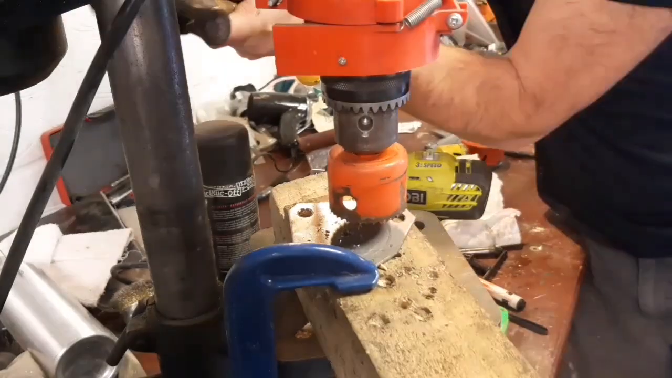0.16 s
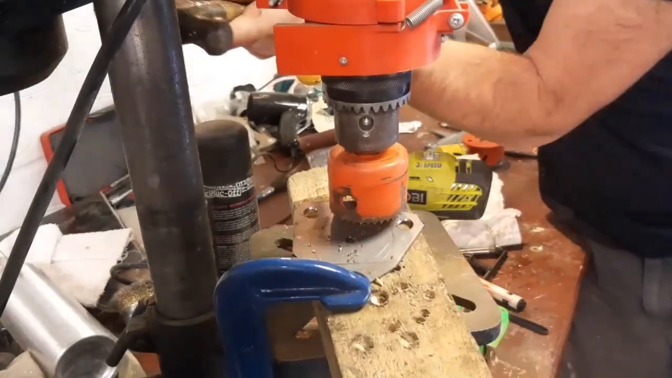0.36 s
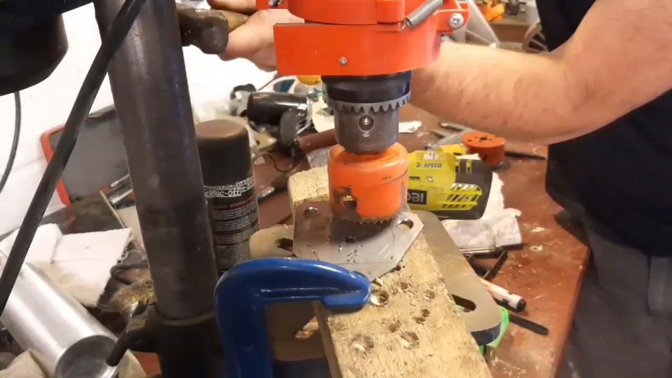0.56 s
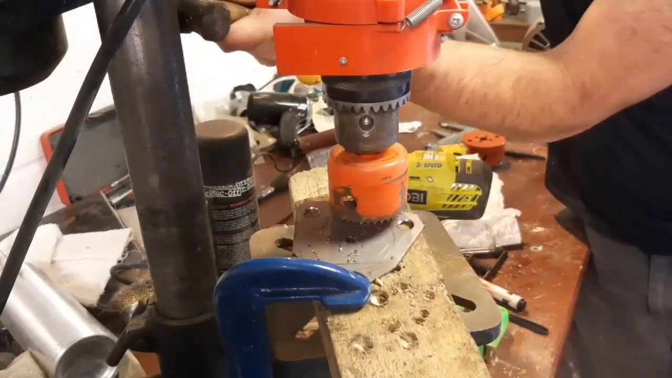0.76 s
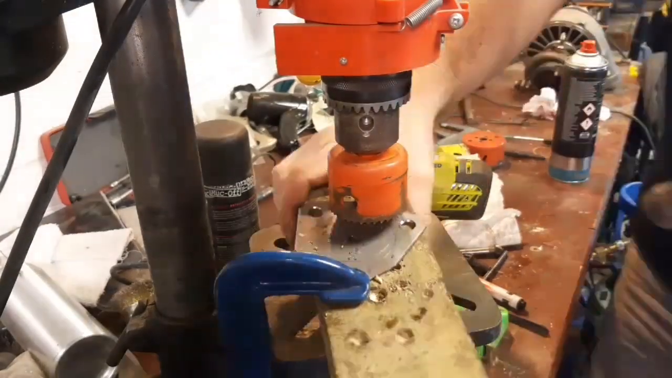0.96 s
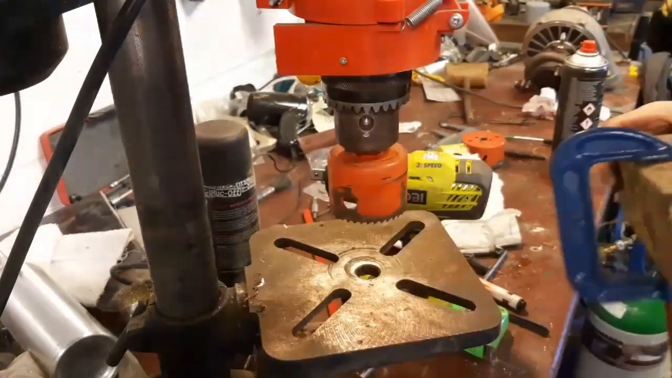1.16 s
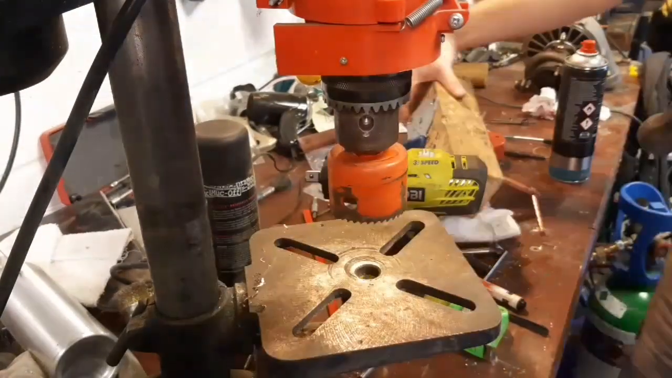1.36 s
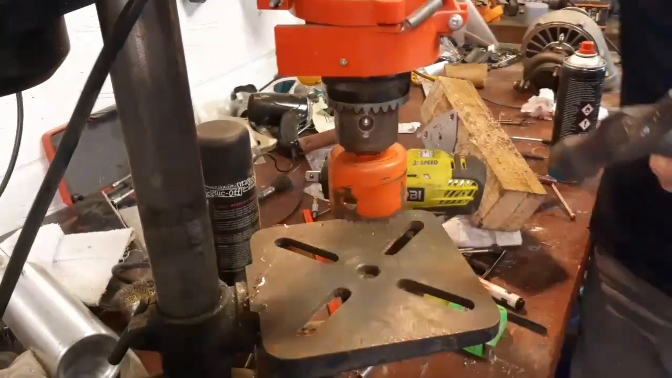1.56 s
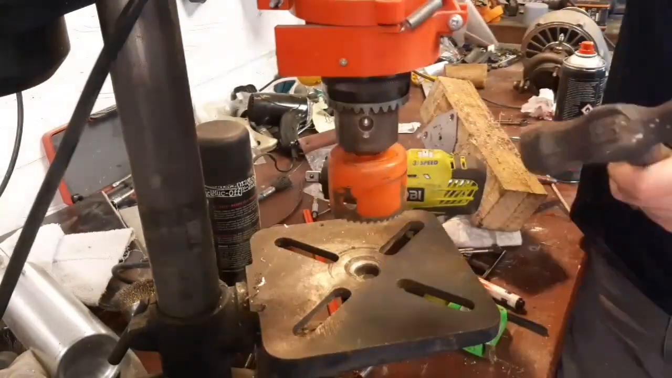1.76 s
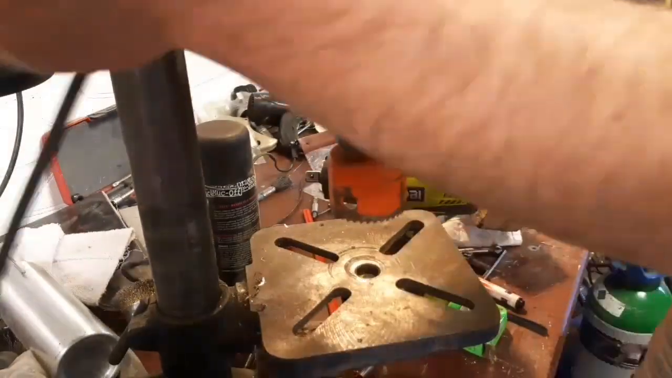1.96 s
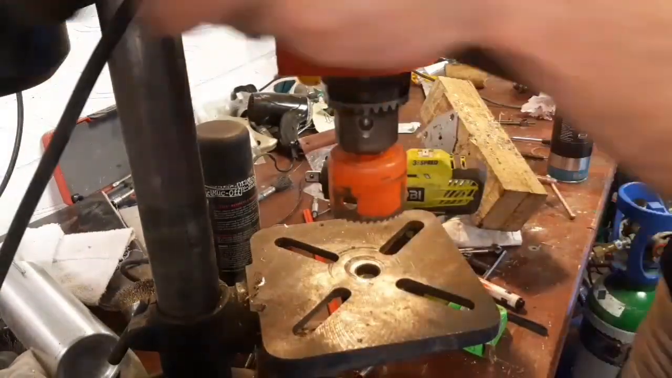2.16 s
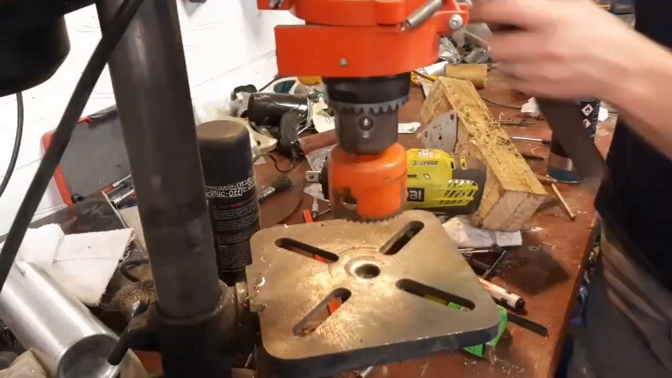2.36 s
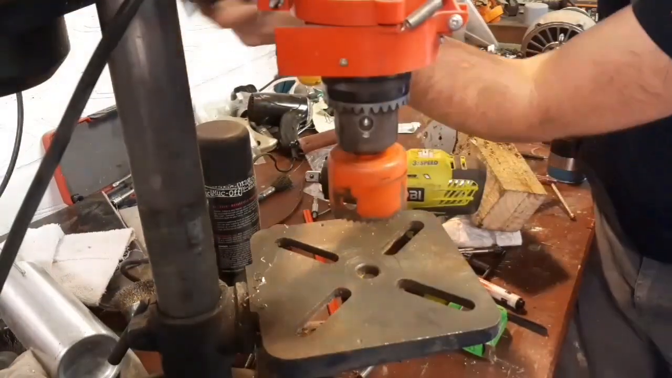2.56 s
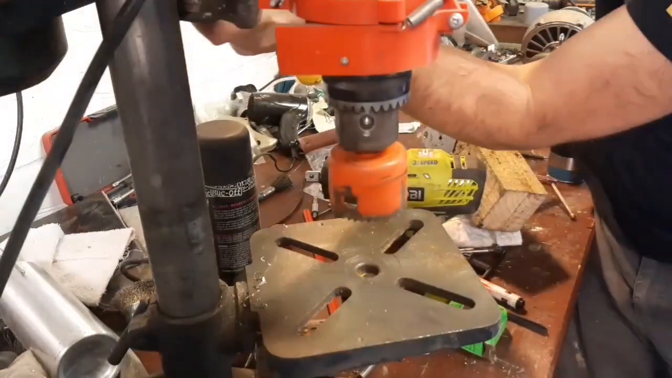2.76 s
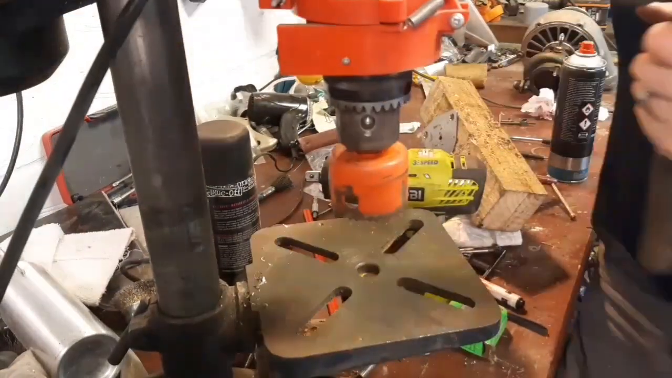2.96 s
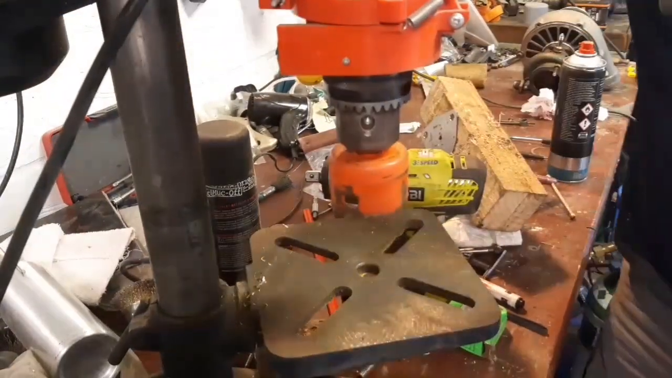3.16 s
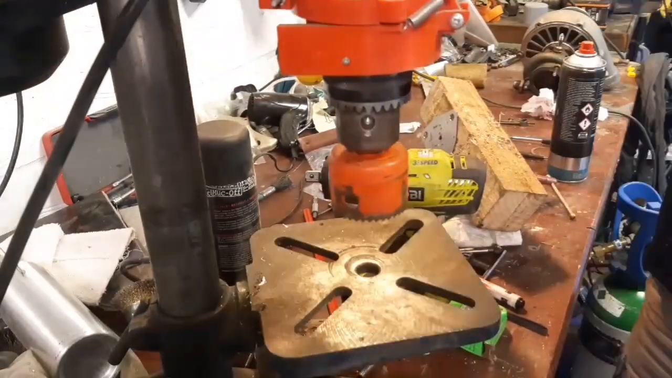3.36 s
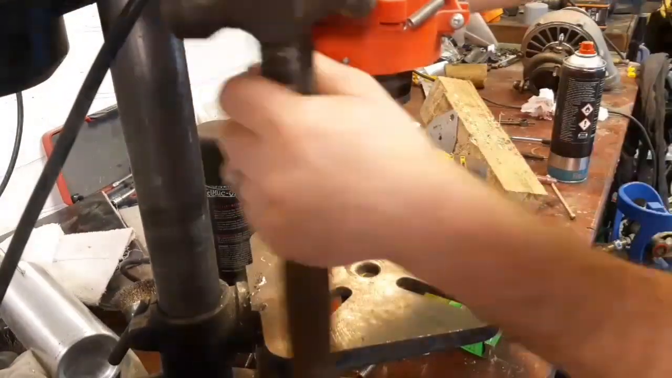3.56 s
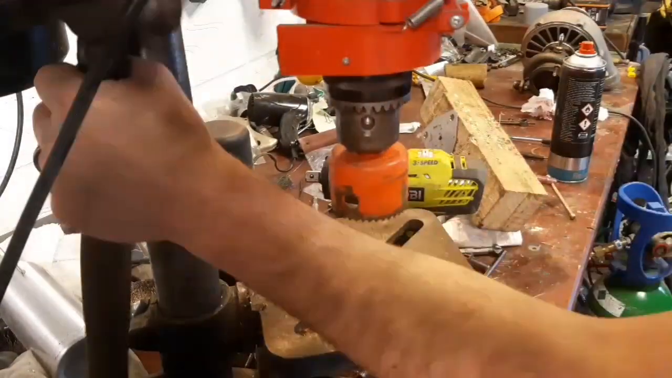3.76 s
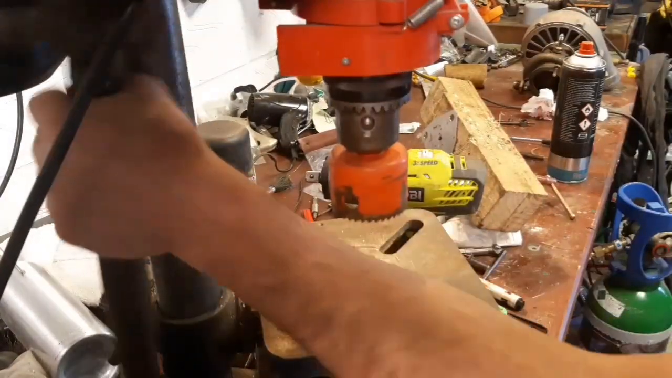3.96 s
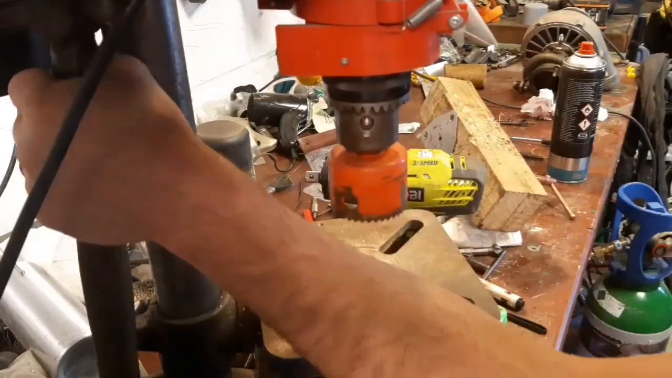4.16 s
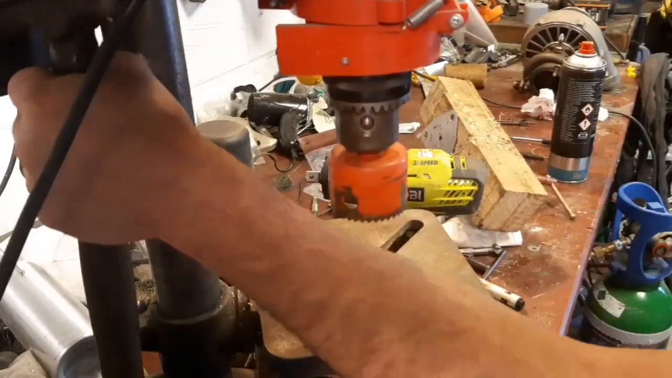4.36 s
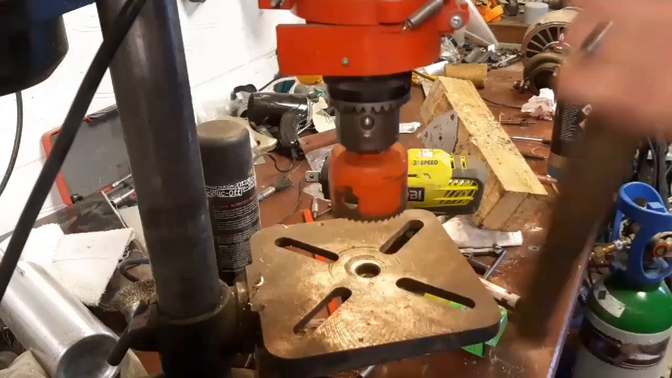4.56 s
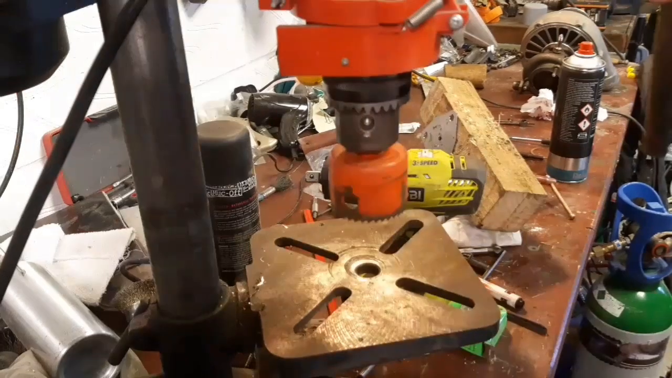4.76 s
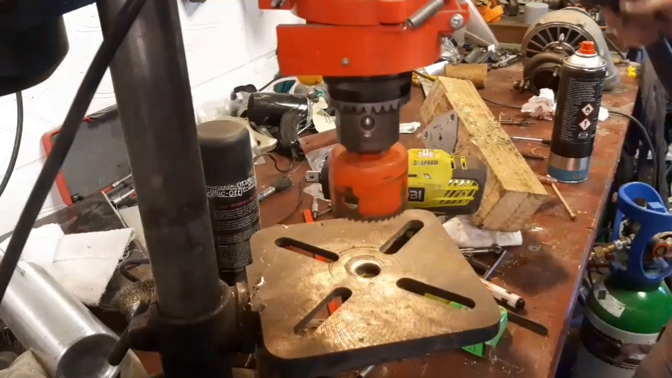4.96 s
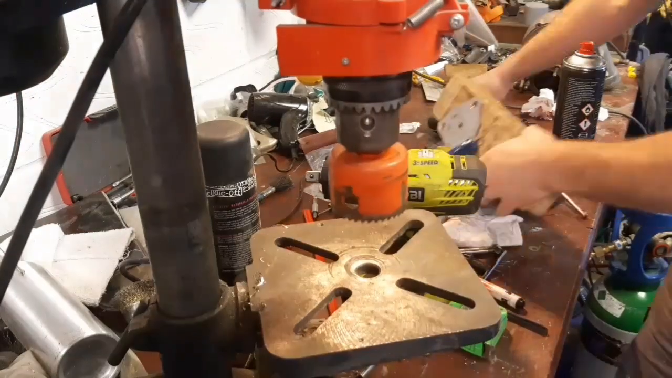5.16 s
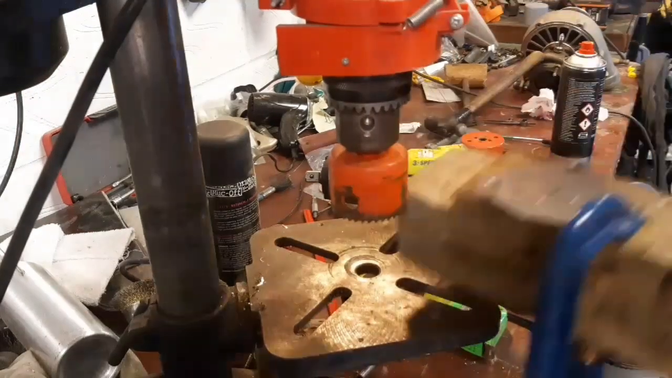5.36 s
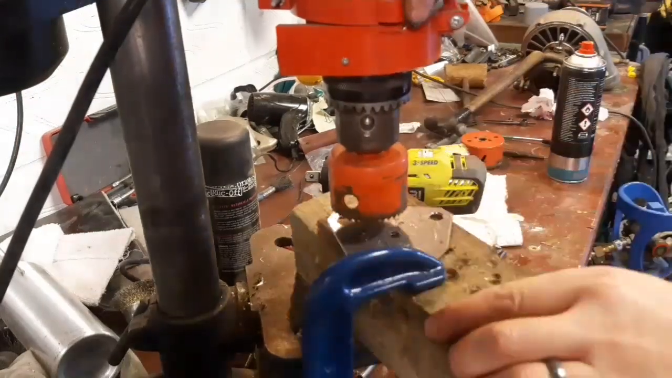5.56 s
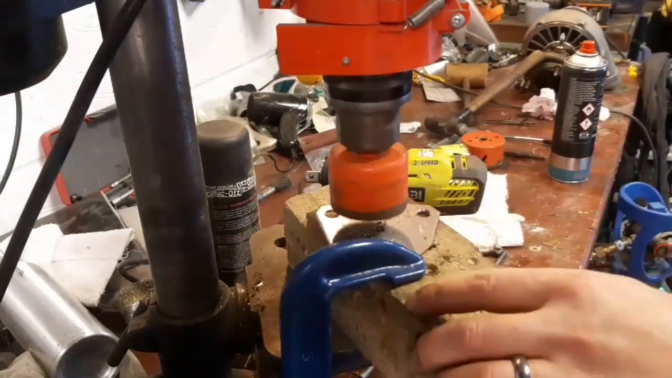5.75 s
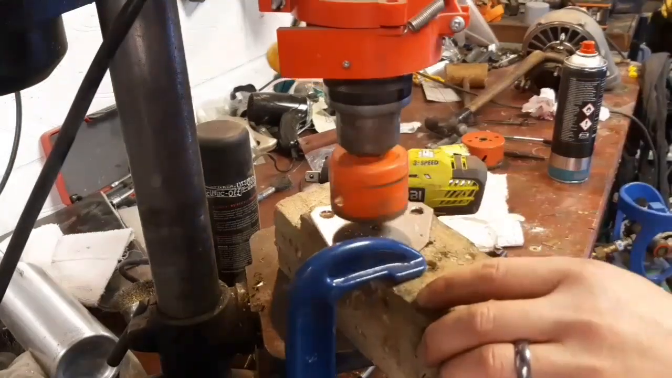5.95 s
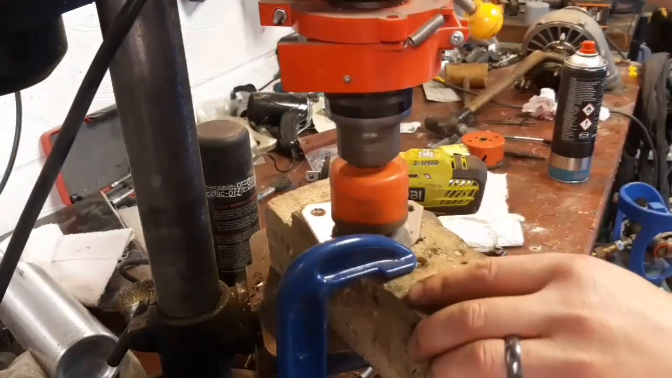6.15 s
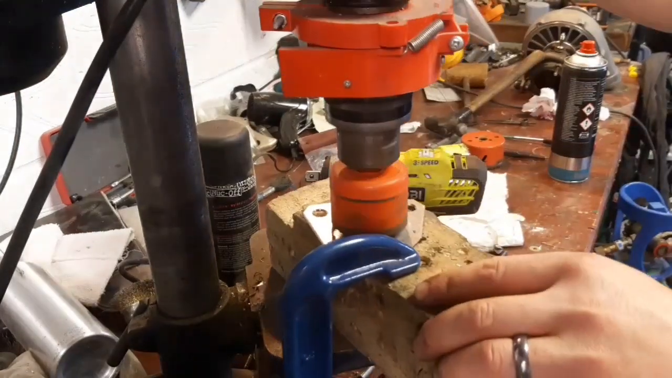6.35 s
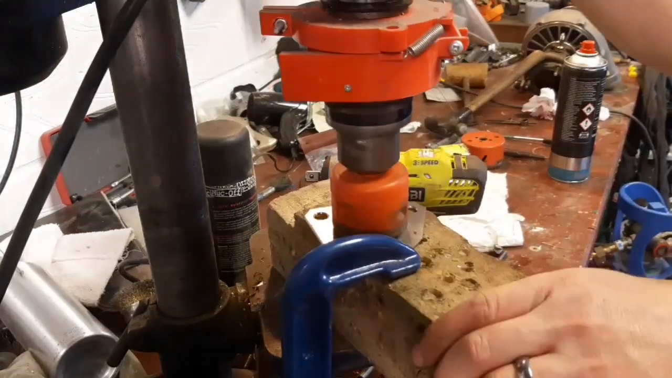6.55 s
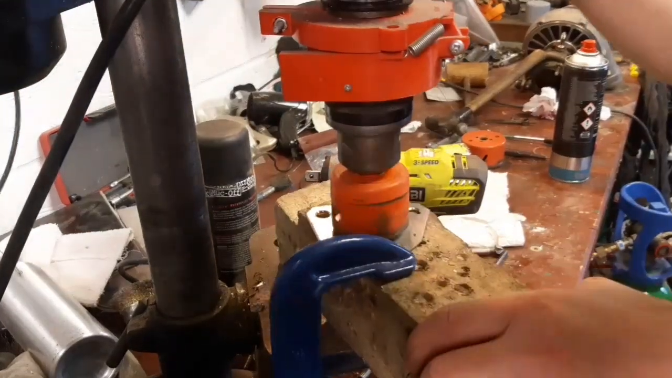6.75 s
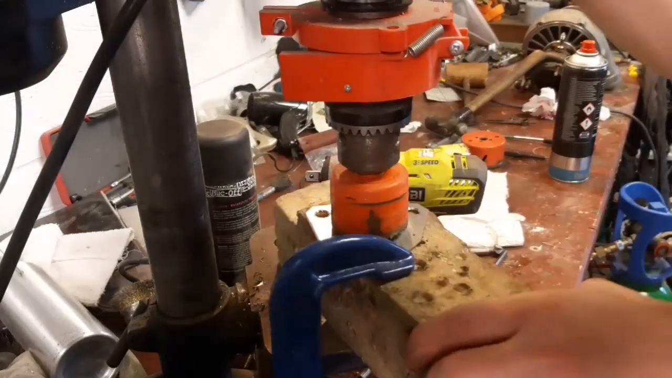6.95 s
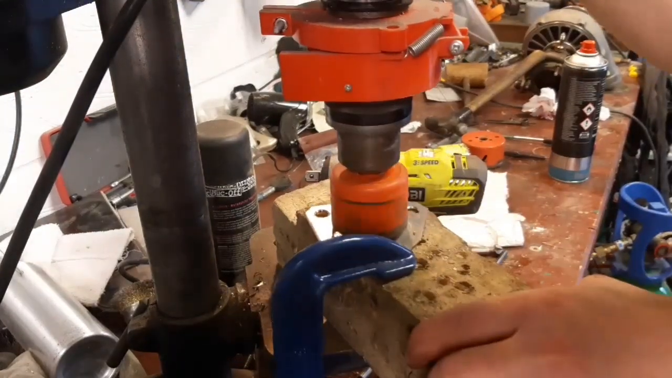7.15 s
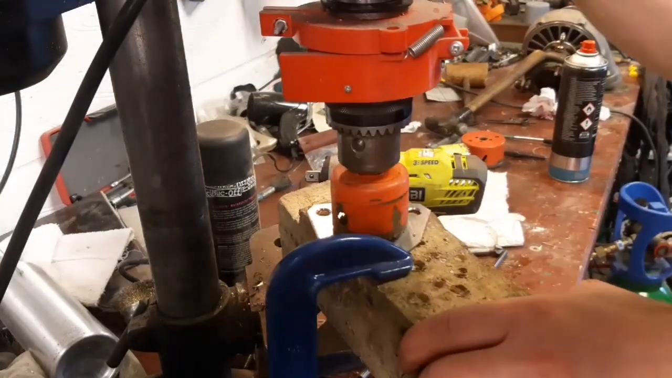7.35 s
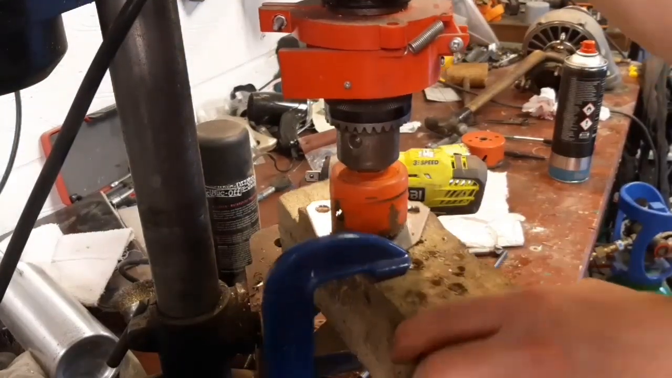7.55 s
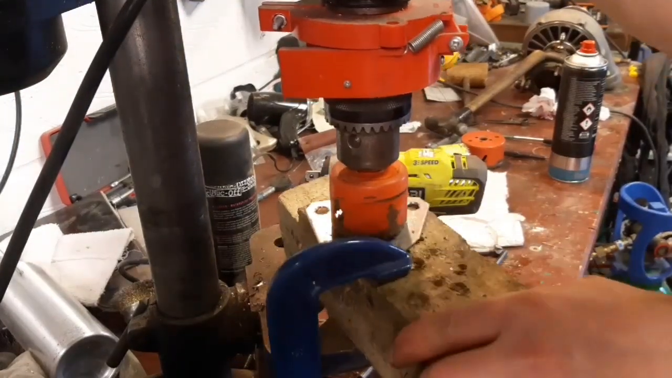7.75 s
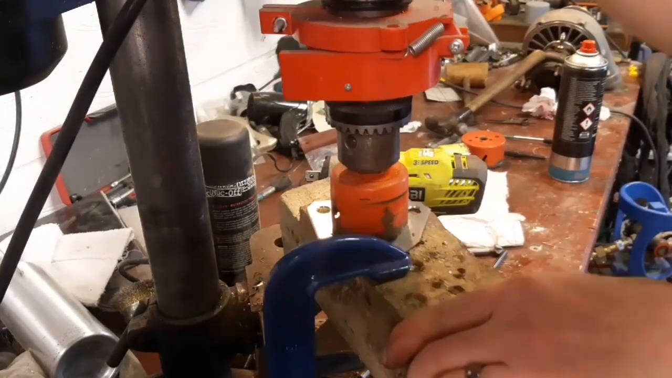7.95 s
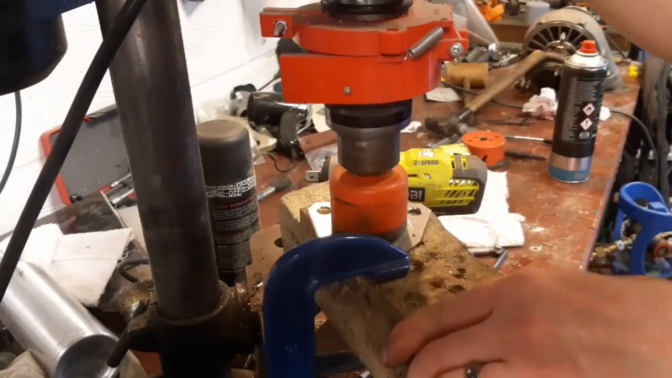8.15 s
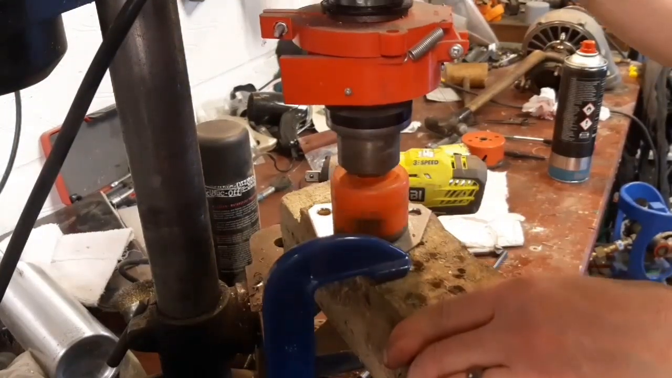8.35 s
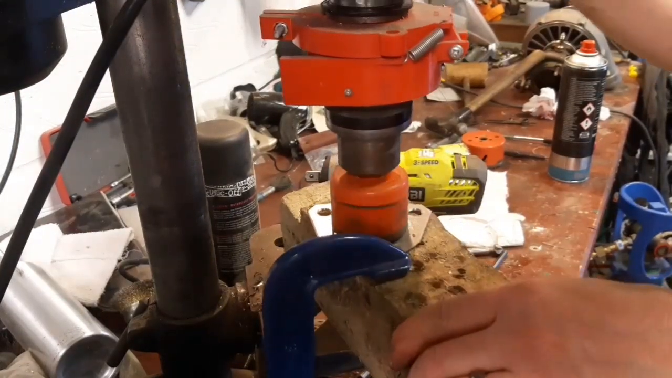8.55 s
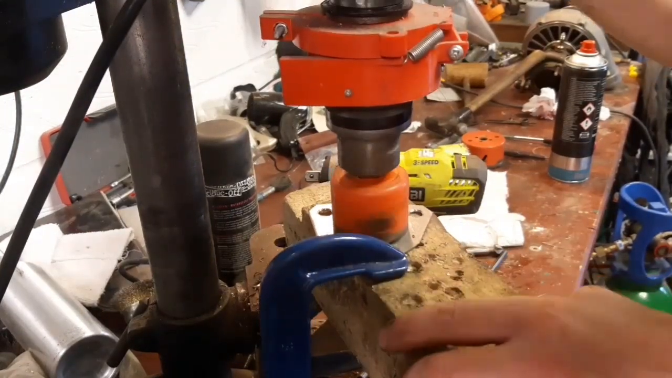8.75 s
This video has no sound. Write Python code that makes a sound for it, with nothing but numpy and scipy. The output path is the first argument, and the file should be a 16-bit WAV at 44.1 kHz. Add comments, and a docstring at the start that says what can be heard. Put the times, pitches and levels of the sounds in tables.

```python
"""Quick runs of hammer blows ring on the iron table of a drill press, close by in a small, hard workshop.
Between and after the runs, a clamped wooden block and tools are knocked and dragged about.
Then the motor starts with a jerk: its magnetic pull makes a buzz, and the gears rattle the housing.
A hole saw bites into metal. Its teeth hiss, catch and chatter, and at the end its rim squeals once a turn."""
import sys
import numpy as np
from scipy import signal
from scipy.fft import rfft, irfft, next_fast_len
from scipy.io import wavfile
from scipy.ndimage import uniform_filter1d

SR = 44100
rng = np.random.default_rng(int(sys.argv[2]) if len(sys.argv) > 2 else 0)


def unload_audio(sound):
    """Save the sound as a 16-bit wav file, at the path given as the first command line argument."""
    columns = np.transpose(np.atleast_2d(sound))
    # keep every value between -1 and 1, then stretch to whole-number steps
    steps = np.round(np.clip(columns, -1, 1) * 32767)
    wavfile.write(sys.argv[1], SR, steps.astype(np.int16))


N = 388962
T = np.arange(N) / SR


# The iron's modes (its natural tones): pitch_hz, level_db, decay_s (time to fade by 60 dB)
IRON_MODES = [(260, -30, 0.11), (403, -23.5, .12), (601, -13.5, 0.067), (944, -14, 0.099),
              (1058, -11, 0.074), (1180, -11.5, 0.14), (1238, -4, 0.098), (1285, -4, 0.04), (1610, -7, 0.1),
              (1870, -20.5, .07), (2403, -4.5, 0.034), (2790, -9.5, 0.038), (3440, -6, 0.09),
              (3800, -9, 0.053), (3990, -3, 0.038), (5260, -25.5, 0.1), (6620, -13, 0.06),
              (7450, -16.5, 0.055), (8300, -18.5, 0.054), (9700, -12.5, 0.072), (12400, -15, 0.044)]
# Many small modes, blurred into noise: pitch_hz, level_db
CLANG_COLOUR = [(35, -64), (60, -31.5), (396, -21.5), (822, -15), (1260, -3.5), (2010, -10), (3990, -8.5),
                (5950, -21), (10200, -15), (15300, -21.5), (16800, -37)]
# Each run hits its own spot: ends_by_s, column_db, hammer_head_db, low_db, middle_db, upper_db
HAMMER_SPOTS = [(0.3, -40.5, -18, 4.5, -3, -11), (1.5, -40.5, -22, 2, -1, -8),
                (3.1, -32.5, -27.5, 5, 2, -2), (4.5, -40.5, -18, -5, 0.5, 2)]
# Hammer blows: start_s, level_db
HAMMER_BLOWS = [(0.037, -9), (0.082, -10), (0.127, -10), (0.17, -9), (0.215, -17), (0.493, -9.5),
                (0.528, -10.5), (0.572, -8.5), (2.409, -9.5), (2.465, -7.5), (2.517, -9.5), (2.567, -9),
                (2.612, -9), (2.658, -9.5), (3.587, -6.5), (3.6293, -6.5), (3.666, -7.5), (3.703, -7.5),
                (3.741, -8), (3.78, -7.5), (3.818, -7.5), (3.856, -10), (3.895, -7), (3.937, -6.5),
                (3.971, -7)]

def hammer():
    """Each blow rings the iron table, the press's column and the hammer head, over a tick and a clang."""
    out, t, clang = np.zeros((2, N)), T[:SR], noise(CLANG_COLOUR)
    dull = shape(clang, [(150, -10), (300, 1), (2000, -3.5), (4200, -9.5), (5500, -7.5), (12000, -12.5)])
    boom = unit(shape(clang, [(190, -23), (260, -1), (620, -8.5), (900, -29.5)]))
    hz, mode_db, decay_s = (c[:, None] for c in np.transpose(IRON_MODES))
    low, middle, upper = hz < 700, (hz > 700) & (hz < 1500), (hz > 3000) & (hz < 9000)
    fades = 1000. ** (-t / decay_s) * gain(mode_db)
    column = tone(2647, t) * fall(t, decay_s=0.7)
    head = tone(10300, t) * fall(t, decay_s=0.13)
    tick = noise([(1500, -18.5), (3500, -2.5), (12000, 3), (17000, -2.5)])
    blows = [(-0.0046, -11)] + list(HAMMER_BLOWS)  # one blow is already ringing at the start
    next_starts = [blow[0] for blow in HAMMER_BLOWS] + [T[-1]]
    for (start_s, db), next_s in zip(blows, next_starts):
        spot = next(row[1:] for row in HAMMER_SPOTS if start_s < row[0])
        column_db, head_db, low_db, middle_db, upper_db = spot
        force, flip, detune = rng.standard_normal((3, len(IRON_MODES), 1))
        strength = np.sign(flip) * gain(2.5 * force + low_db * low + middle_db * middle + upper_db * upper)
        rings = fades * tone(hz * (1 + 0.0044 * detune), t)  # the grip shifts the pitches a little
        x = gain(-12) * np.sum(strength * rings, axis=0) + gain(column_db) * column + gain(head_db) * head
        x *= np.clip((next_s - start_s - t) / 0.002 + 1, 0, 1)  # the next blow chokes the ring
        i = rng.integers(N - SR)
        piece = slice(i, i + SR)
        x += gain(-15) * (clang[piece] * fall(t, 0.057) + dull[piece] * fall(t, 0.12))
        x += gain(low_db - 32.5) * boom[piece] * fall(t, 0.13, rise_s=0.0072)
        x += gain(-5) * tick[piece] * fall(t, 0.008, rise_s=0.0001)
        add(out, start_s, gain(db) * x)
    bass_trim = [(50, -6.5), (170, -1), (250, 1.5), (1000, 1)]  # trim the deep bass of the blows
    return np.array([shape(x, bass_trim) for x in out])


MOTOR_ON_S, BUZZ_HZ = 5.52, 99.56

def drill_press():
    """The motor starts with a jerk and runs on; the saw seizes once, boosting the rattle and hiss."""
    running_s = np.maximum(T - MOTOR_ON_S, 0)
    fade_in = np.clip(running_s / 0.0183, 0, 1)
    jerk_db = 12.5 * np.exp(-running_s / 0.021)
    seize = np.exp(-((T - 7.878) / 0.017) ** 2)
    phase = wavering_phase(BUZZ_HZ, spread=0.00056, rate_hz=6)
    return fade_in * (motor_buzz(phase) + gear_rattle(phase, running_s, jerk_db + 12 * seize)
                      + teeth_hiss(jerk_db + 17 * seize) + bench_rumble())


# Tones of the mains buzz: multiple (of BUZZ_HZ), level_db
BUZZ_TONES = [(4, -45.5), (12, -38.5), (13, -54), (15, -40), (16, -39), (17, -45.5), (19, -37), (21, -34.5),
              (23, -39), (24, -43), (27, -39.5), (29, -50.5)]
# Thin, steady tones of the drive: pitch_hz, level_db
DRIVE_WHINES = [(748.3, -49), (775.2, -49), (796.7, -48), (888.2, -51)]

def motor_buzz(phase):
    """Mains power makes the motor buzz while the drive whines; each tone's level wavers on its own."""
    dip_db = -3 * np.clip((T - 7.65) / 0.25, 0, 1)  # the lower tones weaken in the deep cut
    buzz = sum(gain(db + 1.5 + dip_db * (k < 22) + 2 * wander(5)) * np.sin(k * phase + 7 * rng.random())
               for k, db in BUZZ_TONES)
    return buzz + sum(gain(db + 0.5 + 0.83 * wander(5)) * np.sin(hz / BUZZ_HZ * phase)
                      for hz, db in DRIVE_WHINES)


# Where the head of the press rings: pitch_hz
HEAD_PITCHES = [1085, 1290, 1385, 1680, 1880, 1975, 2270, 2360, 2467, 2750, 2885, 2960, 4055, 1900]
# One row for each of those pitches: width_hz, level_db
HEAD_RINGS = [(18, -12), (14, -12.5), (14.1, -11), (27.6, -4), (40, -1), (30, -0.5), (30, 2.5), (80.6, 3.5),
              (22.2, 2.5), (145, 7), (20, -14), (18, -13.5), (45, 16), (1990, 9.5)]
# Where the case booms: pitch_hz, width_hz, level_db
CASE_RINGS = [(261, 42, -15), (552, 67, -1.5), (620, 52, -3.5), (721, 56, -1.5), (913, 72, 0),
              (1042, 53, -5.5)]
# Rattle as the load on the gears changes: time_s, level_db
GEAR_LOAD = [(5.6, -23.5), (5.7, -21.5), (5.95, -22.5), (6.75, -23.5), (6.93, -21.5), (7.18, -25.5),
             (7.3, -21.5), (7.65, -23.5), (7.84, -21.5), (7.92, -26), (8.3, -23), (8.76, -22),
             (8.82, -24.5)]
# The belt cover's hum swelling and settling: time_s, level_db
COVER_HUM = [(5.56, -50), (5.59, -31), (5.72, -29.5), (5.9, -37), (7.0, -37.5), (8.8, -42)]

def gear_rattle(phase, running_s, boost_db):
    """The gears shake the head, case and belt cover, harder with every magnetic pull of the motor."""
    rattle = rng.standard_normal(N) * gain(1.1 * np.cos(phase) + 0.95 * wander(200))
    head = sum(gain(db + 0.92 * wander(12)) * unit(ring(rattle, hz, width))
               for hz, (width, db) in zip(HEAD_PITCHES, HEAD_RINGS))
    head = unit(shape(head, [(500, -50), (1000, 11), (2900, 5), (3300, -2), (6000, -37.5)]))
    case = unit(sum(gain(db + 1.6 * wander(11)) * ring_twice(rattle, hz, width, 3 * width)
                    for hz, width, db in CASE_RINGS))
    cover = ring_twice(rattle, 410.6, 26, 78)
    load_db = curve(GEAR_LOAD)
    case_db = load_db - 12.5 + 0.59 * running_s  # the boom grows as the saw sinks
    return gain(load_db + boost_db - 3.5) * head + gain(case_db) * case + gain(curve(COVER_HUM) - 1.5) * cover


# The saw's body ringing under its teeth: pitch_hz, level_db
HISS_COLOUR = [(1760, -20.5), (3000, -34.5), (3100, -4), (3740, -5), (3920, -6), (4060, -17), (4350, -6),
               (5530, -2.5), (7180, -12.5), (9390, -11.5), (10800, -14.5), (12700, -12.5), (15500, -17)]
# Hiss as the depth of the cut changes: time_s, level_db
CUT_LEVELS = [(5.6, -40), (6.75, -39.5), (7.3, -39), (7.65, -38.5), (7.97, -40.5), (8.3, -34), (8.76, -32)]

def teeth_hiss(boost_db):
    """Teeth scrape the metal with a fluttering hiss, dotted with tiny chips."""
    chips = 1 + gain(25) * grains(per_second=250, spread_db=2, samples=80)
    hiss = noise(list(HISS_COLOUR[:-1]) + [(15700, -12), (15900, -53)])  # a steep drop at the top
    flutter_db = 0.84 * wander(60) + 0.51 * wander(260)
    return gain(curve(CUT_LEVELS) + boost_db + flutter_db) * chips * hiss


# Where the saw's cup rings: pitch_hz, width_hz, level_db
CUP_RINGS = [(6076, 200, 0), (8800, 2800, -6), (12800, 380, -7), (14200, 200, -9)]
# Teeth catching the metal: start_s, level_db, pitch_hz, jolt_db
TOOTH_CATCHES = [(6.2741, -15, 8500, 0.5), (6.3854, -7.5, 8900, -21), (6.505, -3.5, 8780, -25),
                 (6.5643, -6, 5900, -16), (6.8274, -18.5, 6200, 2), (6.9087, -8.5, 6000, 2),
                 (6.9596, -5, 9150, -9.5), (7.1384, -14, 9250, -23), (7.2686, -11.5, 5100, -5),
                 (7.3038, -23, 5790, 8), (7.3248, -7.5, 6060, -5.5), (7.372, -16.5, 6040, 0),
                 (7.4282, -7, 5870, -8), (7.6954, -15, 6200, 5.5), (7.8266, -7, 5110, -1),
                 (7.854, -5, 7260, -17), (7.8685, -13, 7310, -1), (7.8969, -7, 5200, -2),
                 (7.9254, -9.5, 5060, -2)]

def teeth_catching(white):
    """Teeth snag in short bursts that ring the saw's cup and jolt the wooden block under the metal."""
    out, t = np.zeros((2, N)), T[:SR // 10]
    cup = [gain(db) * ring_twice(white, hz, width, 2 * width) for hz, width, db in CUP_RINGS]
    jolt = noise([(120, -48.5), (300, -4), (1000, 0.5), (2500, 1), (4000, -6), (15500, -13), (16000, -40)])
    jolt += gain(-4.5) * unit(ring(white, hz=543, width_hz=90))  # the block
    chatter = [(7.472 + k * 0.033, -17.5 + 2.6 * rng.standard_normal(), 5900, 5)
               for k in range(8)]  # a spell of evenly spaced catches
    swell = bump(t, peak_s=0.0048)
    for start_s, db, hz, jolt_db in list(TOOTH_CATCHES) + chatter:
        here = slice(int(start_s * SR), int(start_s * SR) + len(t))
        rings = sum(gain(-22.5 + 1.1 * rng.standard_normal()) * mode[here] for mode in cup)
        rings += gain(-20.5) * ring_twice(white[here], hz, 580, 1300)
        burst = rings * swell ** 4 + gain(jolt_db - 12) * jolt[here] * swell ** 2
        add(out, start_s - 0.003, gain(db) * burst)
    return out


# How strong the once-a-turn squeal is: time_s, level_db
SQUEAL_LEVELS = [(7.99, -20.5), (8.16, -13), (8.33, -11.5), (8.5, -15), (8.6, -18), (8.7, -16), (8.75, -19)]
# Shorter, single shrieks: time_s, level_db
RIM_SHRIEKS = [(7.85, -19), (7.8725, -7), (8.046, -16), (8.103, -18), (8.157, -8), (8.275, -9), (8.696, -8)]
SQUEAL_HZ, TURN_S = 7330, 0.0575

def rim_squeal(white):
    """The saw's rim squeals on part of each turn: a high tone, its octave and some grinding noise."""
    loudness = gain(-45) * ((T > RIM_SHRIEKS[0][0]) & (T < SQUEAL_LEVELS[-1][0]))  # faint between swells
    turns = 7.983 + TURN_S * np.arange(14)
    swells = [(s, np.interp(s, *np.transpose(SQUEAL_LEVELS)), 0.015) for s in turns]
    shrieks = [(s, db, 0.0085) for s, db in RIM_SHRIEKS]
    for time_s, db, peak_s in swells + shrieks:
        loudness += gain(db - 16.5) * bump(T - time_s + 0.0071, peak_s) ** 2
    phase = wavering_phase(SQUEAL_HZ, spread=0.0052, rate_hz=280)
    grind = unit(ring(white, SQUEAL_HZ, width_hz=600))
    squeal = np.sin(phase) + gain(-17) * np.sin(2 * phase) + gain(-6.5) * grind
    return loudness * gain(2.9 * wander(300)) * squeal


# Modes of the wooden block: pitch_hz, level_db, decay_s
WOOD_MODES = [(254, -12, 0.13), (407.6, -8, 0.15), (600, -3.5, 0.074), (862, -2.5, 0.048), (1215, -2, .07),
              (1540, -4.5, .04), (2030, -4.5, 0.053), (2740, -1.5, .03)]
# Modes of a steel tool, used for every other object: pitch_hz, level_db, decay_s
TOOL_MODES = [(1470, -5, 0.058), (1685, -6, 0.075), (2356, -6.5, 0.1), (2670, -12, 0.073), (3281, -3, 0.05),
              (3450, -5, 0.1), (4030, -6.5, 0.04), (8100, -16, .06)]
# How each named object sounds: thud_db, body_db, modes_db, base_decay_s
OBJECT_SOUNDS = {"block": (-21.5, -20.5, -19, 0.1478), "wrench": (-31.5, -17, -22, 0.0864),
                 "clamp": (-30.5, -22, -44, 0.1129), "bench": (-10.5, -11.5, -41, 0.16),
                 "spanner": (-32, -18, -12, 0.1274), "box": (-8, -31, -45.5, 0.1551)}
# Things put down or bumped: start_s, object, level_db, pitch_hz, thud_hz, bright_db
OBJECT_KNOCKS = [(0.458, "block", -20.5, 1575, 910, -16.5), (0.814, "clamp", -15, 3000, 638, -12.5),
                 (0.854, "wrench", -17, 2860, 633, -11), (0.955, "block", -5, 5020, 566, -16),
                 (1.092, "clamp", -13.5, 5880, 880, -15), (1.104, "block", -5.5, 1154, 608, -45),
                 (1.141, "clamp", -28, 4650, 596, -4.5), (1.168, "clamp", -25.5, 3660, 594, -12),
                 (1.187, "block", 1, 1560, 630, -28.5), (1.232, "clamp", -26.5, 1160, 600, -5),
                 (1.411, "bench", -43, 2300, 625, -8), (1.618, "clamp", -44, 4100, 396, -8),
                 (1.753, "wrench", -32.5, 5430, 503, -10.5), (1.763, "spanner", -7.5, 1530, 485, -12),
                 (1.772, "box", -18, 1500, 495, -25), (1.802, "wrench", -25, 1590, 566, -13),
                 (1.823, "spanner", -10, 1237, 600, -6), (1.888, "spanner", -8.5, 3440, 584, -16.5),
                 (1.932, "spanner", -2.5, 3470, 610, -16.5), (1.938, "spanner", -12.5, 2310, 620, -14),
                 (1.946, "wrench", -18, 1690, 620, -20), (1.969, "box", -34, 608, 538, -14),
                 (2.32, "wrench", -25, 3200, 870, -14.5), (3.198, "wrench", -35, 1863, 899, -31),
                 (3.221, "block", -25.5, 3070, 556, -35), (3.426, "wrench", -9.5, 5140, 630, -4.5),
                 (3.467, "wrench", -8.5, 2420, 563, -12.5), (3.524, "wrench", -7, 3820, 635, -16),
                 (4.37, "block", -17, 2410, 643, -23), (4.445, "bench", -30.5, 2920, 575, -21),
                 (4.515, "block", -18, 1285, 532, -19.5), (4.612, "wrench", -6, 1506, 527, -15),
                 (4.6153, "wrench", 0, 2326, 512, -13), (4.71, "wrench", -5.5, 2140, 520, -20),
                 (4.7124, "wrench", -3, 1705, 513, -13.5), (4.894, "bench", -43.5, 947, 558, -39),
                 (4.954, "bench", -47, 2015, 570, -7), (5.002, "block", -17.5, 845, 700, -19),
                 (5.01, "block", -10, 1392, 620, -12), (5.257, "clamp", -8.5, 6030, 625, -19.5),
                 (5.258, "box", -25.5, 1470, 541, -34), (5.262, "box", -29, 2370, 1180, -30),
                 (5.33, "clamp", -26.5, 1690, 556, -16), (5.413, "block", -17, 1850, 550, -23),
                 (5.53, "block", -4.5, 1473, 670, -17.5)]

def knocks():
    """Each knock mixes a dull thud, a body ring, a bright scatter and the object's own modes."""
    out, t = np.zeros((2, N)), T[:SR // 3]
    low = noise([(150, -25), (240, -1.5), (550, 5.5), (900, -3.5), (1500, -29)])
    body = noise([(500, -37.5), (1000, 2), (2500, -2), (4000, -5.5), (6000, -29)])
    bright = noise([(2500, -16), (4500, 3), (10000, 0), (15500, -8.5), (17000, -25)])
    tick = gain(9) * fall(t, 0.007, rise_s=0.0001)
    for start_s, thing, db, hz, thud_hz, bright_db in OBJECT_KNOCKS:
        thud_db, body_db, modes_db, decay_s = OBJECT_SOUNDS[thing]
        here = slice(int(start_s * SR), int(start_s * SR) + len(t))
        thud = gain(-5) * low[here] + gain(4) * tone(thud_hz, t) * fall(t, 2.2 * decay_s)
        x = gain(thud_db + 1.5) * thud * fall(t, 0.96 * decay_s, rise_s=0.00078)
        x += gain(body_db - 2.5) * body[here] * fall(t, decay_s)
        bright_fade = tick + fall(t, 0.6 * decay_s) + gain(-14.5) * fall(t, decay_s)
        x += gain(bright_db - 9) * bright[here] * bright_fade
        close_hz = hz * (1 + 0.025 * np.array([[-1], [0], [1]]) * (1 + rng.random((3, 1))))
        cluster = np.sum(gain([[-7], [0], [-7]]) * tone(close_hz, t), axis=0)  # close pitches throb
        x += gain(-10.5) * cluster * fall(t, 0.22 * decay_s, rise_s=0.00068)
        for mode_hz, mode_db, ring_s in WOOD_MODES if thing == "block" else TOOL_MODES:
            strength = gain(modes_db + mode_db + 4 * rng.standard_normal())
            x += strength * fall(t, ring_s) * tone(mode_hz * (1 + 0.008 * rng.standard_normal()), t)
        add(out, start_s, gain(db) * x, left_db=1.5)
    return np.array([shape(x, [(190, -14), (245, -0.5)]) for x in out])  # the deep bass is cut away


# The dry rustle of sliding: pitch_hz, level_db
RUSTLE_COLOUR = [(200, -17.5), (500, -11), (2000, 0), (5000, -2), (11000, -6), (16000, -11.5)]
# Things dragged and handled: middle_s, length_s, pitch_hz, ring_db, rustle_db
DRAG_MOVES = [(0.286, 0.042, 8500, -69, -60), (1.043, 0.11, 1837, -55.5, -62.5),
              (1.16, 0.053, 4600, -58, -59.5), (1.276, 0.05, 576, -43.5, -55.5),
              (1.491, 0.031, 1900, -70, -62), (1.682, 0.055, 5220, -67, -63),
              (1.79, 0.063, 1610, -34.5, -33), (2.013, 0.15, 1980, -70, -62),
              (2.16, 0.042, 2200, -60, -47.5), (2.329, 0.15, 11100, -62.5, -63.5),
              (2.87, 0.04, 10050, -70, -71), (2.893, 0.011, 1400, -59, -73.5),
              (3.234, 0.061, 4420, -51, -65), (3.273, 0.14, 1700, -57, -57),
              (3.141, 0.03, 3800, -70.5, -76), (4.464, 0.076, 2990, -43, -47),
              (4.565, 0.16, 1450, -62, -64), (4.782, 0.025, 2160, -58, -57.5), (4.993, 0.13, 594, -72, -59),
              (5.17, 0.086, 417, -73, -75), (5.335, 0.13, 516, -54.5, -57), (5.477, 0.28, 410, -66, -66)]

def drags():
    """Rough sliding: uneven grains ring the dragged thing over a dry rustle."""
    ticks = gain(35) * grains(per_second=60, spread_db=3, samples=100)
    grit = gain(2.5 * wander(150)) * (1 + ticks)
    rustle, scrape, out = noise(RUSTLE_COLOUR) * grit, rng.standard_normal(N) * grit, np.zeros(N)
    for middle_s, length_s, hz, ring_db, rustle_db in DRAG_MOVES:
        here = slice(int((middle_s - length_s) * SR), int((middle_s + length_s) * SR))
        swell = np.exp(-(2 * (T[here] - middle_s) / length_s) ** 4)
        ringing = unit(ring(scrape[here], hz, 0.044 * hz))
        out[here] += swell * (gain(ring_db) * ringing + gain(rustle_db) * rustle[here])
    return out


def bench_rumble():
    """The press rumbles, and a low thump runs through the bench as the saw first touches."""
    colour = [(20, -7.5), (60, 2), (120, 2), (200, 18), (300, -8)]
    rumble = np.array([noise(colour), noise(colour)])  # each ear gets its own
    thump = noise([(20, -5), (150, -5), (300, -20)]) * fall(T - 6.262, 0.05, rise_s=0.0024)
    return gain(-56.5) * rumble + gain(-27) * thump


# The room's steady noise: pitch_hz, level_db
ROOM_COLOUR = [(30, -19), (120, -21.5), (230, -12), (400, -5.5), (500, -12), (800, -10.5), (2500, -11.5),
               (5000, -19), (16000, -20.5)]
# A faraway hum: pitch_hz, level_db
FAR_TONES = [(398.4, -91), (796.7, -94.5)]

def background():
    """Faint room noise and a distant hum lie under everything."""
    return gain(-75.5) * noise(ROOM_COLOUR) + sum(gain(db + 4) * tone(hz, T) for hz, db in FAR_TONES)


# The part of the sound that is unlike at the two ears: pitch_hz, level_db
STEREO_WIDTH = [(60, -5), (125, -7.5), (250, -10.5), (600, -16), (1290, -10.5), (2380, -12), (4400, 0),
                (15000, -1.5)]
# The left ear faces the press: pitch_hz, left_minus_right_db
LEFT_LEAN = [(100, 5), (300, 3.5), (700, 2.5), (1290, -1), (2380, 8.5), (4400, 4.5), (8120, 5),
             (12000, 6.5)]

def room(sources):
    """The walls add a short, dull echo; nearby reflections reach each ear differently and keep shifting."""
    mono, t = sources.mean(axis=0), T[:SR // 2]
    tail = shape(rng.standard_normal(len(t)), [(130, -5.5), (300, 3.5), (3000, -11), (12000, -6.5)])
    walls = gain(-13) * echo(mono, tail * fall(t - 0.004, decay_s=0.092, rise_s=0.0014))
    reflections = rng.standard_normal((2, len(t))) * fall(t, decay_s=0.01)
    paths = [echo(mono + walls, pattern) for pattern in reflections]
    blend = np.pi * wander(15)  # parts and hands move
    side = shape(np.cos(blend) * paths[0] + np.sin(blend) * paths[1], STEREO_WIDTH)
    hz, db = np.transpose(LEFT_LEAN)
    left, right = (shape(x, np.transpose([hz, sign * db / 2])) for x, sign in zip(sources + walls, (1, -1)))
    low = shape(left, [(2500, 0), (6000, -30)])
    left = left - low + np.roll(low, -3)  # below the treble, the left ear leads by three samples
    return np.array([left + side, right - side])


def gain(db):
    """Turn decibels into a multiplier."""
    return 10 ** (np.asarray(db) / 20)


def unit(x):
    """Scale to an average (rms) level of 1."""
    return x / np.sqrt(np.mean(x ** 2))


def tone(hz, t):
    """A pure tone."""
    return np.sin(2 * np.pi * hz * t)


def shape(x, colour):
    """Turn pitches up or down along a line through (pitch_hz, level_db) points."""
    hz, db = np.transpose(colour)
    size = next_fast_len(len(x))
    f = np.maximum(np.arange(size // 2 + 1) * SR / size, 1)
    return irfft(rfft(x, size) * gain(np.interp(np.log(f), np.log(hz), db)), size)[:len(x)]


def noise(colour):
    """Steady noise of a given colour."""
    return unit(shape(rng.standard_normal(N), colour))


def grains(per_second, spread_db, samples):
    """Tiny clicks of random time and strength."""
    clicks = (rng.random(N) < per_second / SR) * gain(spread_db * rng.exponential(size=N))
    return uniform_filter1d(clicks, size=samples)


def ring(x, hz, width_hz):
    """Let x ring around one pitch."""
    return signal.lfilter(*signal.iirpeak(min(hz, 0.45 * SR), hz / width_hz, fs=SR), x)


def ring_twice(x, hz, width_hz, outer_width_hz):
    """A cleaner ring, scaled to level 1."""
    return unit(ring(ring(x, hz, width_hz), hz, outer_width_hz))


def echo(x, pattern):
    """Send x through a pattern of reflections."""
    return signal.fftconvolve(x, pattern / np.linalg.norm(pattern))[:N]


def fall(t, decay_s, rise_s=0.0005):
    """A hit's loudness: a quick rise, then 60 dB down in decay_s."""
    t = np.maximum(t, 0)
    return (1 - np.exp(-t / rise_s)) * 1000. ** (-t / decay_s)


def bump(t, peak_s):
    """Swell to 1 at peak_s, then die away."""
    u = np.clip(t / peak_s, 0, 50)
    return u * np.exp(1 - u)


def wander(rate_hz):
    """A smooth random drift, about 1 in size."""
    k = int(SR / rate_hz)
    steps = np.repeat(rng.standard_normal(N // k + 1), k)
    return unit(uniform_filter1d(uniform_filter1d(steps, k), k)[:N])


def wavering_phase(hz, spread, rate_hz):
    """The running angle of a tone whose pitch drifts."""
    return 2 * np.pi * np.cumsum(hz * (1 + spread * wander(rate_hz))) / SR


def curve(points):
    """Join (time_s, value) points with straight lines."""
    return np.interp(T, *np.transpose(points))


def add(out, start_s, x, left_db=0):
    """Mix x into both channels, left_db louder on the left."""
    i = int(round(start_s * SR))
    x = x[max(-i, 0):N - i]
    i = max(i, 0)
    out[:, i:i + len(x)] += x * gain(np.array([[left_db], [-left_db]]) / 2)


def scene():
    """All the sources together in the small room."""
    sources = hammer() + knocks() + drags() + drill_press()
    white = rng.standard_normal(N)  # plain noise that sets the saw ringing
    return room(sources + teeth_catching(white) + rim_squeal(white) + background())


def record(dry):
    """The loudest peaks are rounded and the highest treble is cut."""
    rounded = np.tanh(dry / 1.3) * 1.3
    return signal.sosfilt(signal.ellip(8, 0.2, 70, 16400, fs=SR, output="sos"), rounded)


dry = scene()
out = record(dry)
unload_audio(out)
```